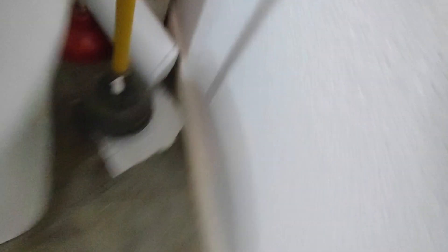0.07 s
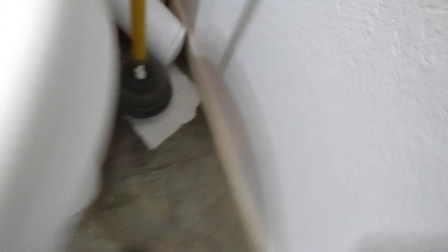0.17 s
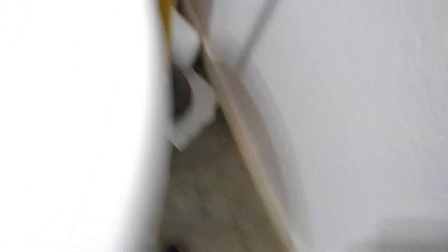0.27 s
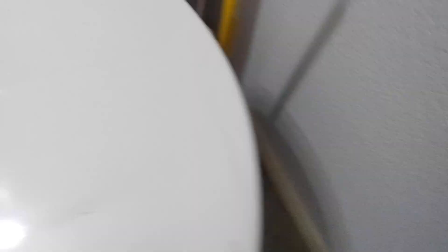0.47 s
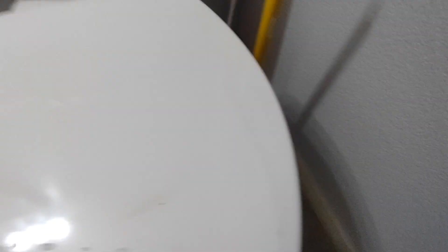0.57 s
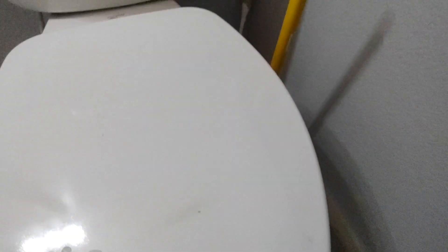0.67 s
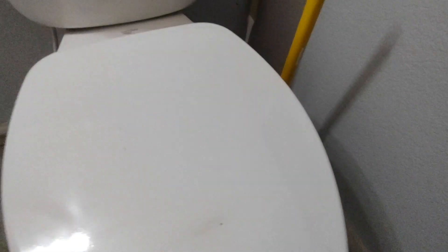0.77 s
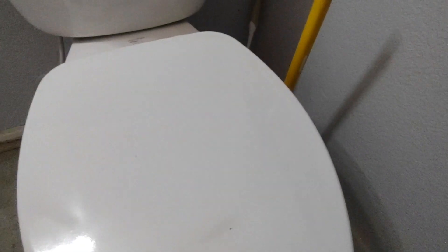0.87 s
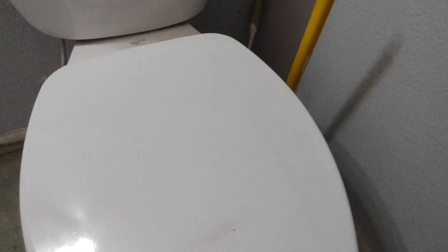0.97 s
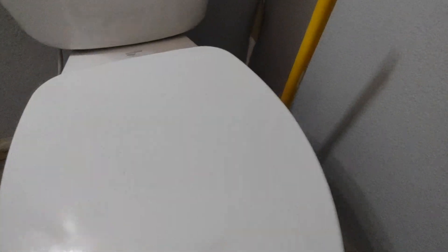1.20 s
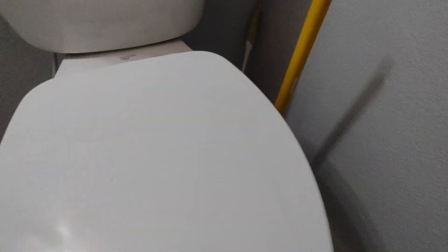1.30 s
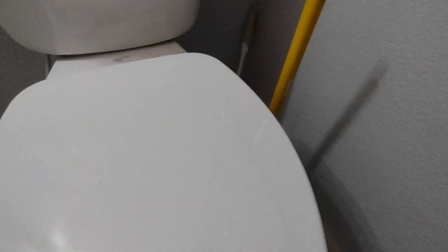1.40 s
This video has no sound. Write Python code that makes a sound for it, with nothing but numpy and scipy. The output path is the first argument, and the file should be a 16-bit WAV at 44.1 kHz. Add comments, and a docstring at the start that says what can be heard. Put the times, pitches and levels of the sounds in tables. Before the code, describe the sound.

A finger rubs over the microphone, ending in a sharp, thumping crack in a small restroom.

```python
"""Plastic ticks right at the microphone: a hand shifts its grip on a camera over a toilet lid.
The place is a small restroom. A finger covers the left microphone port and rubs across it in
three dull strokes; the last stroke booms, thumps and ends in a sharp crack.
Something scuffs further off, and to the right a hiss like a filling cistern dies away."""
import sys
import numpy as np
from scipy import signal
from scipy.fft import rfft, irfft, next_fast_len
from scipy.io import wavfile
from scipy.ndimage import uniform_filter1d

SR = 44100
rng = np.random.default_rng(int(sys.argv[2]) if len(sys.argv) > 2 else 0)


def to_wav(sig):
    """Store sig (one row per channel, or 1-D mono) as 16-bit WAV at the path in sys.argv[1].

    Samples outside -1..1 are clipped; the rate is SR.
    """
    pcm = np.clip(np.atleast_2d(sig), -1, 1) * 32767
    pcm = np.round(pcm).astype(np.int16)
    wavfile.write(sys.argv[1], SR, pcm.T)  # frames by channels


N = 63945

# The room tone. Each row: time in seconds, then rumble, midrange and hiss levels in dB.
ROOM_LEVELS = [(0, -58, -59, -54), (0.15, -52, -64, -54.5), (0.36, -52, -61, -58.5),
               (0.46, -64, -70, -58.5), (0.5, -54, -60, -61), (0.57, -57.5, -67.5, -62.5),
               (0.7, -60, -67.5, -62), (0.95, -62, -70, -69.5), (1.15, -67.5, -77.5, -75),
               (1.45, -68, -81, -79)]
# Colours of the room tone and a distant bump. Each row: frequency in Hz, relative level in dB.
RUMBLE_SPECTRUM = [(20, -37.5), (45, -15), (80, 5), (110, -2.5), (150, -10.5), (210, -11), (330, -20.5),
                   (600, -57.5)]
MIDRANGE_SPECTRUM = [(200, -19.5), (370, -7), (520, 1.5), (680, -7), (860, -7), (1300, -11.5), (2200, -45)]
HISS_SPECTRUM = [(600, -24), (1600, -2.5), (2400, 0), (3000, 0), (4000, -5), (5400, -0.5), (7000, -7.5),
                 (9000, -12.5), (12000, -29), (15500, -29.5), (16500, -54)]
BUMP_SPECTRUM = [(60, -12), (140, 13.5), (230, 9), (320, -5), (700, -43)]
# Resonances in the hiss. Each row: pitch and width in Hz, level in dB, centre and spread in seconds.
HISS_RESONANCES = [(519.4, 35, -70, 0.95, 0.18), (2950, 250, -71, .76, .12), (5100, 350, -72, .89, 0.072),
                   (2370, 94, -75, 0.91, .07)]
# The restroom's echo. Each row: frequency in Hz, time to fall 60 dB (t60) in seconds.
WALL_DECAY = [(100, .35), (1000, 0.14), (4000, 0.29), (12000, 0.05)]
# Scuffs further off. Each row: start in seconds, rough peak in dB, t60 in seconds.
LID_SCUFFS = [(0.5917, -47.5, .06), (0.609, -46.5, .04)]
# Plastic knocks close by. Each row: start in seconds, rough peak in dB, t60 in seconds,
# tilt in dB per octave, left over right in dB, grit from 0 to 1.
PLASTIC_KNOCKS = [(0.1553, -26.5, 0.018, -3.5, 1.5, .2), (0.1712, -25.5, 0.018, -6.5, -7.5, .3),
                  (0.174, -28.5, 0.028, 1.5, -4.5, .95), (0.199, -36, .04, 0, -3, .9),
                  (0.234, -32.5, 0.02, -0.5, -13, .7), (0.298, -44.5, 0.052, -1.5, -2.5, .9),
                  (0.326, -30.5, 0.03, -4.5, -3, .3), (0.425, -31, 0.022, -7.5, -4.5, .8)]
# Ticks under the finger. Each row: start in seconds, rough peak in dB, tilt in dB per octave.
CASE_TICKS = [(0.0138, -22.5, 1), (0.069, -27.5, -1.5), (0.1553, -20.5, 1.5)]
# Colours of the contacts and the sliding hand. Each row: frequency in Hz, relative level in dB.
SCUFF_SPECTRUM = [(300, -34), (1200, 4), (2000, -0.5), (2800, 6), (4000, -5), (5500, -5), (9000, -28),
                  (15000, -45)]
KNOCK_SPECTRUM = [(60, -7), (300, -1.5), (600, 2), (1200, -2.5), (1800, -5.5), (2600, -1), (4000, -10),
                  (8000, -19.5), (15000, -45.5)]
TINY_TICK_SPECTRUM = [(2000, -19), (6000, -11), (11000, -1), (13000, -10.5), (16000, -16.5)]
CASE_TICK_SPECTRUM = [(80, 0.5), (300, 1.5), (700, 0), (1200, -2), (1800, -9.5), (2700, -8.5), (3500, -18),
                      (5000, -25), (9000, -42), (15000, -55)]
RUSTLE_SPECTRUM = [(40, 7), (130, 7.5), (250, -5.5), (1400, -4.5), (2400, 0.5), (3400, -16), (6000, -11.5),
                   (12000, -34)]
# The finger's muffling of the left port. Each row: frequency in Hz, gain in dB.
FINGER_MUFFLING = [(300, 4.5), (1000, -9.5), (2000, -16.5), (3500, -14), (6000, -17), (15000, -12.5)]
# Three strokes across that port. Each row: time in seconds, strength in dB.
RUB_STRENGTH = [(0.13, -59), (0.186, -47), (0.205, -30), (0.22, -21), (0.235, -26), (0.25, -35.5),
                (0.275, -50), (0.288, -38.5), (0.302, -26), (0.319, -24.5), (0.346, -35.5), (0.395, -41.5),
                (0.42, -31.5), (0.438, -15.5), (0.446, -15.5), (0.452, -28.5), (0.47, -47), (0.495, -80)]
# Colours of the skin friction and the crack. Each row: frequency in Hz, relative level in dB.
RUB_LOW_SPECTRUM = [(20, -16.5), (60, -7.5), (130, 2.5), (190, -3), (280, -12), (400, -27.5), (900, -77)]
RUB_MID_SPECTRUM = [(120, -33), (260, 0), (420, -3.5), (600, -2), (800, -9.5), (1100, -7.5), (1400, -19),
                    (2200, -33.5), (4000, -72.5)]
RUB_HIGH_SPECTRUM = [(700, -25.5), (1500, -1.5), (2600, -4.5), (3400, -15.5), (5000, -24), (8000, -39),
                     (12000, -58), (16000, -69.5)]
CRACK_SPECTRUM = [(200, -21.5), (800, 5), (1900, -3), (3400, 2.5), (5000, -1.5), (7500, -10.5),
                  (10000, -15.5), (12000, -25.5), (16000, -28.5)]
# Three brief tones that colour the loudest rub. Each row: frequency in Hz, level in dB.
RUB_TONES = [(228, -7.5), (604, -15), (1047, -19)]
# Sudden pressure steps at the port. Each row: start in seconds, strength in dB.
PRESSURE_STEPS = [(0.447, 0.5), (0.4623, -0.2)]
# Faint crackles, then a sharp crack at the left port. Each row: start in seconds, rough peak in dB.
PORT_CRACKS = [(0.4549, -29.5), (0.4566, -31), (0.4614, -30), (0.4634, -3.5)]

TIME = np.arange(N) / SR


def amp(db):
    """Decibels to gain."""
    return 10 ** (np.asarray(db) / 20)


def unit(x):
    """Scaled to rms 1."""
    return x / np.sqrt(np.mean(x ** 2) + 1e-20)


def along(points, hz):
    """Values between (Hz, value) points on a log axis."""
    freqs, values = np.transpose(points)
    return np.interp(np.log(hz + 1), np.log(freqs + 1), values)


def curves(rows, lag_s=0):
    """One value per sample for each column after the time."""
    times, *columns = np.transpose(rows)
    return [np.interp(TIME - lag_s, times, column) for column in columns]


def swell(centre_s, width_s):
    """A smooth, bell-shaped rise and fall."""
    return np.exp(-((TIME - centre_s) / width_s) ** 2 / 2)


def filtered(x, response):
    """x shaped by a gain that depends on frequency."""
    size = next_fast_len(N + SR // 2)
    return irfft(rfft(x, size) * response(np.fft.rfftfreq(size, 1 / SR)), size)[..., :N]


def noise(spectrum):
    """Coloured noise of rms 1."""
    return unit(filtered(rng.standard_normal(N), lambda hz: amp(along(spectrum, hz))))


def stereo_noise(spectrum, shared):
    """Noise with a share of its power common to both microphones."""
    common = np.sqrt(shared) * noise(spectrum)
    return common + np.sqrt(1 - shared) * np.array([noise(spectrum), noise(spectrum)])


def burst(start_s, t60, spectrum, tilt_db=0, grit=1, size=8192):
    """A coloured contact, peak about 1: a clean impulse with a share (grit) of dying noise."""
    t, hz = np.arange(size) / SR, np.fft.rfftfreq(size, 1 / SR)
    colour_db = along(spectrum, hz) + tilt_db * np.log2(np.maximum(hz, 200))
    cepstrum = irfft(np.log(amp(colour_db)))
    cepstrum[1:size // 2] *= 2  # minimum phase: nothing sounds before the contact
    cepstrum[size // 2 + 1:] = 0
    fade = amp(-60 * t / t60)
    grains = rng.standard_normal(size) * fade / np.linalg.norm(fade)
    push = np.sqrt(grit) * grains + np.sqrt(1 - grit) * (t == 0)
    contact = irfft(rfft(push) * np.exp(rfft(cepstrum)))
    contact *= np.linalg.norm(fade) / np.linalg.norm(contact) / 2
    return np.pad(contact, (round(start_s * SR), N))[:N]


def whistles():
    """Faint, narrow resonances of the hiss swell and fade."""
    out = 0
    for pitch, width, db, centre_s, spread_s in HISS_RESONANCES:
        band = filtered(rng.standard_normal((2, N)), lambda hz: 1 / (1 + (2 * (hz - pitch) / width) ** 2))
        out += amp(db) * swell(centre_s, spread_s) * unit(band)
    return out


def room_tone(hiss_left_db=-5.5):
    """Fading rumble and midrange, a hiss from the right, and one soft, distant bump."""
    rumble_db, midrange_db, hiss_db = curves(ROOM_LEVELS)
    hiss = amp(hiss_db) * stereo_noise(HISS_SPECTRUM, shared=.03) + whistles()
    bump = amp(-60) * swell(centre_s=.825, width_s=.03) * stereo_noise(BUMP_SPECTRUM, shared=.973)
    rumble = amp(rumble_db) * stereo_noise(RUMBLE_SPECTRUM, shared=.85)
    midrange = amp(midrange_db) * stereo_noise(MIDRANGE_SPECTRUM, shared=.49)
    return rumble + midrange + hiss * amp([[hiss_left_db], [0]]) + bump


def wall_echo(x):
    """The small room answers at both microphones, each frequency dying at its own speed."""
    hz, t, bands = signal.stft(rng.standard_normal((2, SR // 2)), SR, nperseg=256)
    decay = amp(-60 * t / along(WALL_DECAY, hz)[:, None])
    _, tail = signal.istft(bands * decay, SR, nperseg=256)
    return signal.fftconvolve(x[None], tail / np.linalg.norm(tail[0]), axes=1)[:, :N]


def lid_scuffs():
    """Two faint scrapes further off, as the lid settles."""
    return sum(amp(db) * burst(s, t60, SCUFF_SPECTRUM) for s, db, t60 in LID_SCUFFS)


def plastic_knocks():
    """Short, dead contacts of plastic close to the microphones, then one tiny bright tick."""
    knocks = sum(amp(db + np.array([[pan], [-pan]]) / 2) * burst(s, t60, KNOCK_SPECTRUM, tilt, grit)
                 for s, db, t60, tilt, pan, grit in PLASTIC_KNOCKS)
    return knocks + amp(-59.5) * burst(start_s=1.171, t60=.012, spectrum=TINY_TICK_SPECTRUM)


def hand_rustle():
    """The hand slides softly on the case, reaching both ports."""
    return amp(-51) * stereo_noise(RUSTLE_SPECTRUM, shared=.2) * swell(centre_s=.245, width_s=.06)


def covered(x, release_s=.35, release_takes_s=.01):
    """The finger muffles what reaches the left port until release_s."""
    free = np.clip((TIME - release_s) / release_takes_s, 0, 1)
    muffled = filtered(x, lambda hz: amp(along(FINGER_MUFFLING, hz)))
    return free * x + (1 - free) * muffled


def port_ring(hz=266, hold_s=.14, fade_s=.04):
    """A faint tone at the covered port holds, then fades."""
    fade = np.clip((hold_s - TIME) / fade_s + 1, 0, 1)
    return amp(-43) * fade * np.sin(2 * np.pi * hz * TIME)


def case_ticks(t60=.012):
    """The case ticks under the finger, right at the port."""
    return sum(amp(db) * burst(s, t60, CASE_TICK_SPECTRUM, tilt, grit=.37) for s, db, tilt in CASE_TICKS)


def friction(spectrum, gain_db, growth, lag_s, evenness, pivot_db=-25):
    """One band of skin friction, rising by growth dB for each dB of rubbing."""
    rub_db, = curves(RUB_STRENGTH, lag_s)
    rasp = noise(spectrum)
    flutter = np.sqrt(np.abs(uniform_filter1d(rasp ** 2, size=450)) + 1e-6)
    steadied = unit(rasp / flutter ** evenness)
    return steadied * amp(gain_db + pivot_db + growth * (rub_db - pivot_db))


def finger_rubs():
    """Skin drags across the port: a rasp with a rumble just behind it."""
    low = friction(RUB_LOW_SPECTRUM, gain_db=8.5, growth=.98, lag_s=.003, evenness=.9)
    mid = friction(RUB_MID_SPECTRUM, gain_db=1.5, growth=1.1, lag_s=.0003, evenness=.8)
    high = friction(RUB_HIGH_SPECTRUM, gain_db=-15.5, growth=.8, lag_s=.0003, evenness=.6)
    return low + mid + high


def port_bang(tones_s=.4412, port_hz=72, port_t60=.056, rise_s=.00077, crack_t60=.0049):
    """Tones colour the loudest rub, pressure steps swing the port's low resonance, a crack ends it."""
    tones = sum(amp(db) * np.cos(2 * np.pi * hz * (TIME - tones_s)) for hz, db in RUB_TONES)
    tones *= swell(tones_s, width_s=.0042)
    thumps = 0
    for s, db in PRESSURE_STEPS:
        age = np.maximum(TIME - s, 0)
        rise = 1 - np.exp(-(age / rise_s) ** 2)
        thumps -= amp(db - 60 * age / port_t60) * rise * np.cos(2 * np.pi * port_hz * age)
    cracks = sum(amp(db) * burst(s, crack_t60, CRACK_SPECTRUM, grit=.12) for s, db in PORT_CRACKS)
    return tones + thumps + cracks


def scene():
    """The room reaches both microphones; the finger plays on the left one alone."""
    near, far = plastic_knocks(), lid_scuffs()
    echo = wall_echo(amp(-6.5) * near.mean(axis=0) + amp(3) * far)
    lean_right = amp([[-6], [2]])
    left, right = hand_rustle() + near + (far + echo) * lean_right + room_tone()
    left = covered(left) + port_ring() + finger_rubs() + case_ticks() + port_bang()
    microphone_noise = amp(-82) * rng.standard_normal((2, N))
    return np.array([left, right]) + microphone_noise


def record(dry, ceiling=.98, top_hz=16700):
    """The recorder rounds off the highest peaks and keeps nothing above its band limit."""
    rounded = dry / (1 + np.abs(dry / ceiling) ** 8) ** (1 / 8)
    return filtered(rounded, lambda hz: hz < top_hz)


dry = scene()
out = record(dry)
to_wav(out)
```